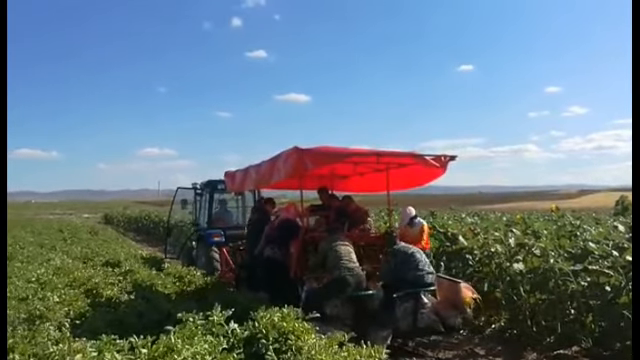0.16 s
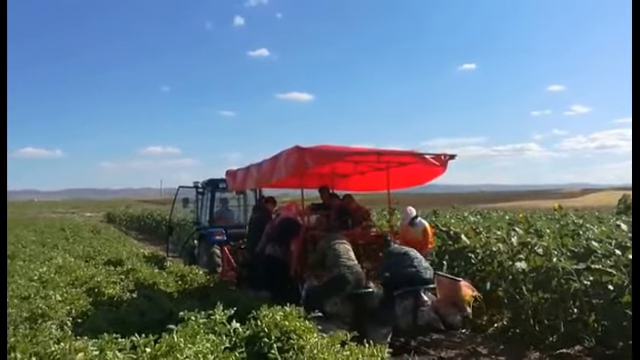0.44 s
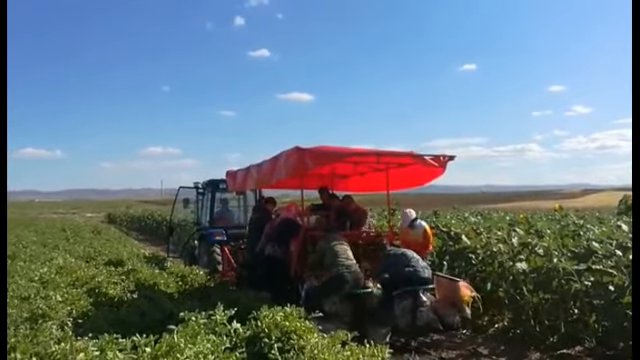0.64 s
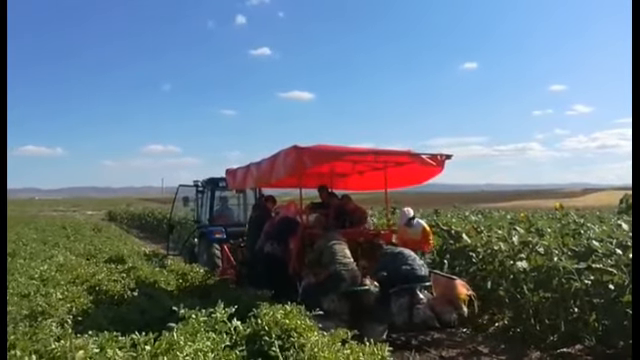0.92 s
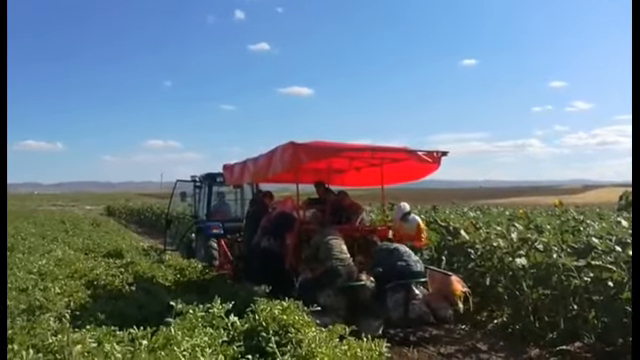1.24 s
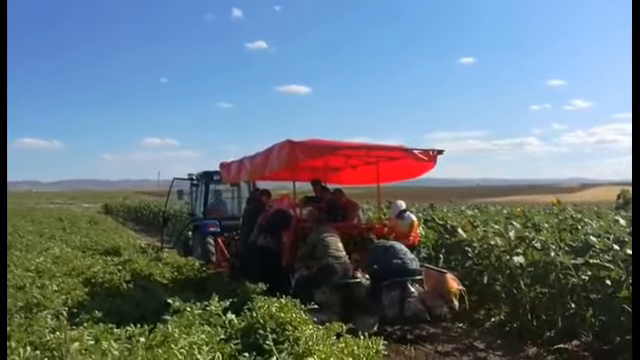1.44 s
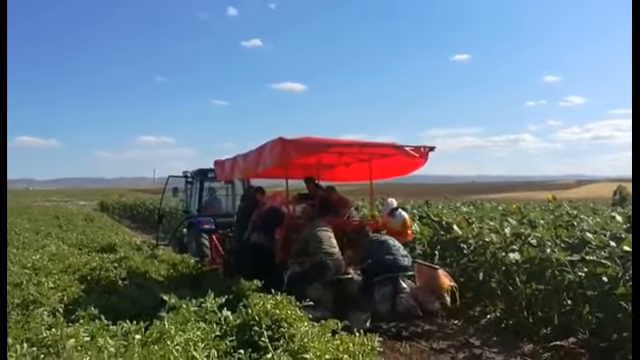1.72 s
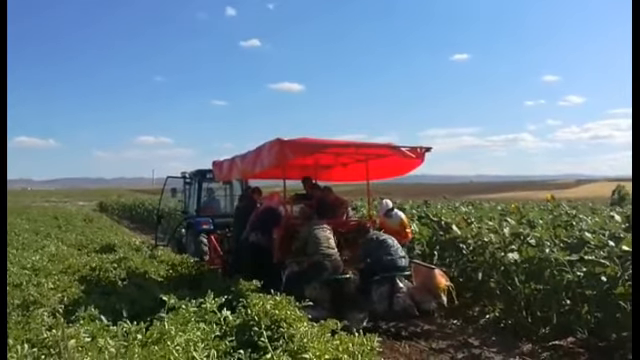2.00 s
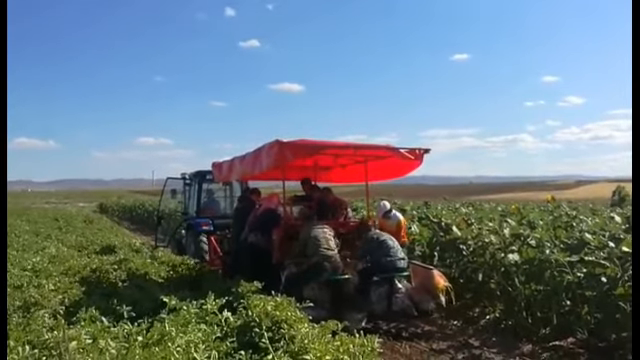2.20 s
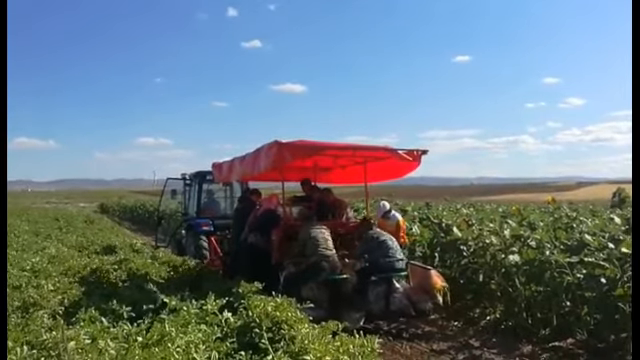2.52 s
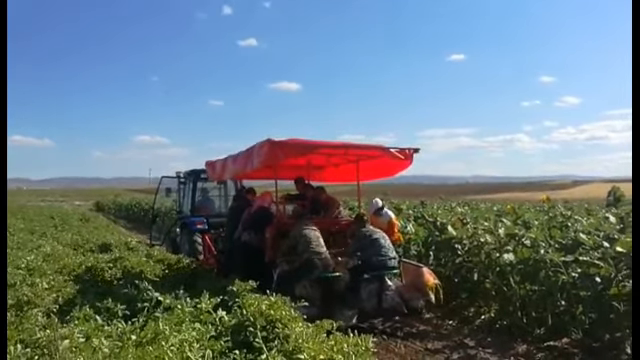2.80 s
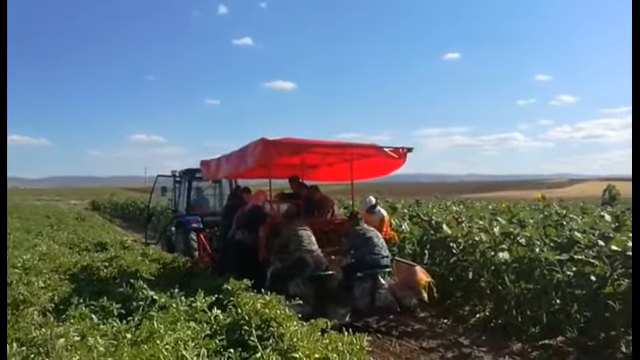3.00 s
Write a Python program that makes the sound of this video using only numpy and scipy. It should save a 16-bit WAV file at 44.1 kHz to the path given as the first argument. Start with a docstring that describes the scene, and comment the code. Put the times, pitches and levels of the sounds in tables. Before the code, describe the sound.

Harvester chain rattling steadily behind a rumbling tractor, with one metal clank and wind gusts.

```python
"""A tractor tows a potato harvester through a field, heard from several metres behind.
From the start the sieve chain clatters over the throbbing diesel, surging at each jolt; soil hisses
through the bars, stalks crackle and gusts rumble on the microphone. At 1.5 s a loose steel part clanks
and bounces, then the dry links squeak more often. The wind drops after 2.5 s; a faint clank comes at 3 s."""
import sys
import numpy as np
from scipy import signal
from scipy.fft import rfft, irfft
from scipy.io import wavfile

SR = 44100
rng = np.random.default_rng(int(sys.argv[2]) if len(sys.argv) > 2 else 0)


def output_pcm(signal):
    """Save a mono or channel-first signal as 16-bit PCM at the path in sys.argv[1].

    Samples are clipped to [-1, 1] before scaling.
    """
    pcm = np.clip(np.atleast_2d(signal).T, -1, 1) * 32767
    wavfile.write(sys.argv[1], SR, np.round(pcm).astype(np.int16))


N = 138915
T = np.arange(N) / SR
BIN_HZ = np.arange(N // 2 + 1) * SR / N
SIDES = np.array([[1], [-1]])  # left, right


def from_db(db):
    """Decibels to gain."""
    return 10 ** (np.asarray(db) / 20)


def unit_rms(x):
    """Scale to unit power."""
    return x / np.sqrt(np.mean(x ** 2) + 1e-20)


def per_sample(points):
    """Curve over time, read at every sample."""
    return np.interp(T, *np.transpose(points))


def per_bin(points):
    """Curve over log frequency, read at every bin."""
    hz, value = np.transpose(points)
    return np.interp(np.log(BIN_HZ + 1e-3), np.log(hz), value)


def drift(rate_hz):
    """Low-passed noise, unit RMS."""
    return unit_rms(irfft(rfft(rng.standard_normal(N)) / (1 + (BIN_HZ / rate_hz) ** 2), N))


def swell(centre_s, level_db, half_width_s):
    """Gaussian envelope."""
    return from_db(level_db) * np.exp(-((T - centre_s) / half_width_s) ** 2)


def pan(pan_db):
    """Channel gains; pan_db is left minus right."""
    return from_db(SIDES * pan_db / 2)


def ring(x, hz, t60_s):
    """One mode: a unit click rings a decaying unit sine."""
    r, w = from_db(-60 / (t60_s * SR)), 2 * np.pi * hz / SR
    return signal.lfilter([0, np.sin(w)], [1, -2 * r * np.cos(w), r * r], x + 1e-18)


def contacts(per_s, spread_db):
    """Two streams of random, uneven clicks."""
    sizes = from_db(spread_db * np.minimum(rng.exponential(1, (2, N)), 4))
    return sizes * rng.choice([-1, 1], (2, N)) * (rng.random((2, N)) < per_s / SR)


# Left-right likeness: freq_hz, coherence_before_clip
PORT_LIKENESS = [(40, 5), (90, 3), (150, 1.8), (300, 0.3), (560, 1), (950, 1), (1600, 0.57), (2300, 0.3),
                 (3300, 0.9), (6000, 0.24)]
# Left-right balance: freq_hz, pan_db
PORT_BALANCE = [(100, 1), (350, 1.5), (600, 5), (760, -2), (1050, 1), (1500, 2), (1780, 3), (2050, 0.5),
                (2700, 8.5), (3080, -4), (3700, 9.5), (4900, 11), (6300, -0.5), (9000, 2.5)]
# Left-right phase: freq_hz, left_lead_rad
PORT_LEAD = [(60, 0), (260, 1.11), (690, -1.26), (1600, 0.5), (1890, -0.5), (2300, -1.8), (3100, -0.9),
             (3800, -1), (6400, -2.5)]
def stereo(pair, colour_db=0):
    """Two unrelated signals to coloured left and right microphone ports, unit RMS."""
    mid, side = rfft(pair) * from_db(colour_db)
    coherence = np.clip(per_bin(PORT_LIKENESS), -.99, .99)
    mixed = np.sqrt(1 + coherence) * mid + SIDES * np.sqrt(1 - coherence) * side
    ports = pan(per_bin(PORT_BALANCE)) * np.exp(1j * SIDES * per_bin(PORT_LEAD) / 2)
    return unit_rms(irfft(mixed * ports, N))


def noise(spectrum):
    """Coloured stereo noise, unit RMS."""
    return stereo(rng.standard_normal((2, N)), per_bin(spectrum))


# Chain jolts: start_s, level_db, length_s, tilt_db_per_octave
CHAIN_JOLTS = [(0.081, -36.5, 0.05, 0.5), (0.29, -37.5, 0.023, 2), (0.383, -34.5, 0.0087, -5),
               (0.462, -42, 0.1, 1.5), (0.554, -40, 0.077, -3), (0.672, -38, .045, -3.5),
               (0.857, -35.5, 0.049, -3.5), (0.957, -39.5, 0.024, -0.5), (1.031, -39, 0.091, -3),
               (1.152, -33, 0.014, -3), (1.194, -42.5, 0.014, 8.5), (1.252, -35.5, 0.012, -3),
               (1.5, -39, 0.044, 2.5), (1.545, -34.5, 0.016, -2.5), (1.726, -35, 0.025, -2),
               (1.84, -38, 0.016, -2), (1.955, -35, 0.055, -1), (2.003, -34, 0.031, -3),
               (2.134, -41.5, 0.04, 1), (2.238, -44.5, 0.023, -2.5), (2.299, -40, 0.04, 0.5),
               (2.418, -42.5, 0.036, 5.5), (2.577, -37, 0.08, -1.5), (2.714, -37.5, 0.018, -5.5),
               (2.804, -34.5, 0.037, -1.5), (2.873, -35.5, 0.055, -1), (2.933, -39.5, .028, 5.5),
               (3.011, -37.5, 0.0091, -1), (3.1, -36, 0.052, -4)]
# Harvester frame modes: freq_hz, bandwidth_hz, gain_db
FRAME_MODES = [(615, 25, -17.5), (803, 100, -12), (1050, 120, -11.5), (1136, 96, -16), (1379, 39.5, -5),
               (1499, 40, -4), (1755, 75, -3), (1837, 45, -0.5), (1930, 86, -0.5), (2252, 95, -3.5),
               (2692, 50, -6.5), (2910, 140, -8), (3450, 21, -17)]
# Bar scrape: freq_hz, density_db
BAR_SPECTRUM = [(400, 9.5), (1200, -4), (2500, 3.5), (3600, 8), (4900, 2), (5900, -5.5), (7600, -6.5),
                (9000, -32), (10500, -50.5), (15000, -58)]
def sieve_chain():
    """Dense metal contacts ring the frame and scrape the bars, surging at each jolt."""
    attack_s, release_s, sag_db_per_s = .005, .022, 22
    idle_db, frame_gain_db, bar_gain_db, pivot_hz = -45.5, -6.5, -6.5, 1675
    start_s, level_db, length_s, tilt_db_per_octave = np.transpose(CHAIN_JOLTS)
    age_s = T - start_s[:, None]
    attack = np.clip(age_s / attack_s + .5, 0, 1)
    release = np.exp(-np.maximum(age_s - length_s[:, None], 0) / release_s)
    sag_db = sag_db_per_s * np.maximum(age_s, 0)
    jolt_power = (from_db(level_db[:, None] - sag_db) * attack * release) ** 2
    clicks = contacts(per_s=2500, spread_db=.5)
    frame = 0
    for k, (hz, bandwidth_hz, gain_db) in enumerate(FRAME_MODES):
        tilt = from_db(tilt_db_per_octave * np.log2(hz / pivot_hz))
        power = from_db(idle_db) ** 2 + tilt ** 2 @ jolt_power
        mode = ring(clicks * np.sqrt(power), hz, t60_s=np.log(1000) / (np.pi * bandwidth_hz))
        frame += (-1) ** k * from_db(gain_db) * np.sqrt(power.mean()) * unit_rms(mode)
    clatter = from_db(frame_gain_db) * frame.std() * stereo(frame)
    scrape_level = np.sqrt(from_db(tilt_db_per_octave) ** 2 @ jolt_power)  # one octave above the pivot
    return clatter + from_db(bar_gain_db) * scrape_level * stereo(clicks, per_bin(BAR_SPECTRUM))


# Engine orders: crank_multiple, gain_db
ENGINE_ORDERS = [(1, -5.5), (2, -7.5), (3, 3), (4, -7), (5, -4), (6, -4), (7, -13.5), (8, -6.5), (9, -10.5),
                 (10, -10)]
# Exhaust and running gear: freq_hz, density_db
EXHAUST_SPECTRUM = [(20, 22), (75, 12.5), (145, 3), (250, -14.5), (330, -22.5), (500, -21.5), (700, -20.5),
                    (1100, -21.5), (2000, -60), (9000, -85)]
def diesel():
    """Uneven crank orders over exhaust noise that pulses twice a turn."""
    crank_hz, wander, rough_db = 26.27, .0048, 3.5
    hum_gain_db, exhaust_db = -46.5, -39
    crank_rad = 2 * np.pi * np.cumsum(crank_hz * (1 + wander * drift(2.1))) / SR
    hum = 0
    for order, gain_db in ENGINE_ORDERS:
        level = from_db(gain_db + rough_db * drift(23))
        hum += level * np.sin(order * crank_rad + rng.uniform(0, 2 * np.pi))
    exhaust = from_db(exhaust_db) * noise(EXHAUST_SPECTRUM) * (1 + np.cos(2 * crank_rad))
    return from_db(hum_gain_db) * np.sqrt(2) * hum + exhaust


# Soil hiss: freq_hz, density_db
SOIL_SPECTRUM = [(300, -1.5), (700, -2.5), (1000, 2), (1800, 1), (2400, -2), (3800, -4), (4900, -8),
                 (5900, -17.5), (7600, -19.5), (8600, -51.5), (10500, -76.5)]
# Soil flow: time_s, level_db
SOIL_FLOW = [(0.0, -40), (0.95, -41), (1.67, -42), (2.19, -40.5), (2.67, -40.5), (2.82, -41), (3.15, -40)]
def soil():
    """Earth and stalks slide steadily over the sieve."""
    gain_db, flicker_db = -1.57, .5
    return from_db(per_sample(SOIL_FLOW) + gain_db - flicker_db * drift(13)) * noise(SOIL_SPECTRUM)


# Strikes and bounces: start_s, level_db, most_excited_hz, pan_db
STEEL_STRIKES = [(1.464, -27.5, 2930, 4), (1.507, -38, 4600, 6), (1.553, -37.5, 496, 2),
                 (3.018, -42.5, 3100, 7)]
# Steel part modes: freq_hz, gain_db, t60_s
STEEL_MODES = [(536, -4, .025), (1110, -2.5, 0.17), (1647, -6.5, 0.092), (1746, -11, 0.11),
               (2323, -6, 0.063), (2794, -19.5, 0.044), (3027, -8.5, 0.11), (3078, -1.5, 0.068),
               (4630, -13, .08), (4990, -16.5, 0.033), (8140, -22, 0.16), (8340, -23, .1),
               (8670, -27.5, .07)]
def steel_clank():
    """A loose steel part strikes with a crack and buzzes as it rings; each contact favours other modes."""
    rise_s, hold_s, crack_gain_db, crack_t60_s = .009, .008, -14.5, .22
    buzz_depth, buzz_hz, falloff_db_per_octave = .42, 150, 5

    def blow(start_s, t60_s):
        """Rise, hold, decay."""
        rise = np.clip((T - start_s) / rise_s + .5, 0, 1)
        return rise * from_db(-60 * np.maximum(T - start_s - hold_s, 0) / t60_s)

    crack = sum(from_db(db + crack_gain_db) * blow(s, crack_t60_s) for s, db, _, _ in STEEL_STRIKES)
    out = crack * noise(BAR_SPECTRUM)
    for hz, gain_db, t60_s in STEEL_MODES:
        buzz = 1 + buzz_depth * (drift(buzz_hz) + 1j * drift(buzz_hz))
        tone = np.real(buzz * np.exp(2j * np.pi * (hz * T + rng.random())))
        for start_s, level_db, most_excited_hz, pan_db in STEEL_STRIKES:
            falloff_db = falloff_db_per_octave * abs(np.log2(hz / most_excited_hz))
            out += pan(pan_db) * from_db(level_db + gain_db - falloff_db) * blow(start_s, t60_s) * tone
    return out


# Link squeaks: centre_s, level_db, half_width_s, pitch_hz
LINK_SQUEAKS = [(0.383, -40, .012, 1850), (1.519, -35, 0.016, 1880), (1.841, -40.5, 0.0072, 1850),
                (2.147, -48, .009, 1950), (2.255, -40, 0.041, 1835), (2.423, -39, 0.0088, 1910),
                (2.433, -39.5, 0.0137, 2010), (2.474, -38, 0.0057, 1985), (2.824, -40, 0.016, 1855),
                (3.015, -40.5, .022, 1440)]
def link_squeaks():
    """Dry links stick and slip on their rollers: short rough tones of unsteady pitch."""
    wander, jitter_hz, rough_db = .01395, 87, 2
    rad_per_hz = 2 * np.pi * np.cumsum(1 + wander * drift(jitter_hz)) / SR
    tones = sum(swell(*envelope) * np.sin(hz * rad_per_hz) for *envelope, hz in LINK_SQUEAKS)
    return pan(pan_db=2.5) * from_db(rough_db * drift(jitter_hz)) * tones


# Snap clusters: centre_s, level_db, half_width_s
STALK_CRACKLES = [(.285, -57.5, .012), (0.617, -52, 0.011), (2.2, -53, .01), (2.648, -51, 0.023),
                  (2.81, -52.5, 0.034), (2.943, -49, 0.034), (3.14, -52.5, 0.024)]
# Snap colour: freq_hz, density_db
SNAP_SPECTRUM = [(1500, -26), (4500, 6.5), (7000, -6), (9000, -7.5), (10500, -27), (11400, -11),
                 (12500, -22), (15000, -24)]
def stalks():
    """Dry stalks snap in the sieve in short bright clusters."""
    level = sum(swell(*crackle) for crackle in STALK_CRACKLES)
    return level * stereo(contacts(per_s=700, spread_db=4), per_bin(SNAP_SPECTRUM))


# Gusts: time_s, level_db
GUSTS = [(0, -28.5), (.15, -33.5), (.24, -38.5), (.33, -23.5), (.43, -33), (.58, -30), (.65, -35),
         (.71, -28.5), (.75, -30.5), (.87, -27), (.95, -38), (1.04, -29), (1.13, -32.5), (1.18, -39.5),
         (1.28, -28.5), (1.39, -25), (1.46, -35.5), (1.54, -49.5), (1.63, -36.5), (1.76, -31),
         (1.84, -31.5), (1.89, -40), (2.02, -32), (2.14, -39), (2.22, -32.5), (2.34, -34), (2.39, -41.5),
         (2.53, -36.5), (2.8, -49), (3.15, -45)]
# Wind rumble: freq_hz, density_db
RUMBLE_SPECTRUM = [(12, -22), (30, -12), (60, -3), (100, 0.5), (160, -3.5), (220, -9), (290, -20),
                   (380, -32.5), (600, -42.5), (1500, -92)]
# Strong-gust flutter: freq_hz, density_db
FLUTTER_SPECTRUM = [(60, -32), (160, 0.5), (250, 9), (320, 0), (400, -9.5), (650, -60), (3000, -100)]
# Single eddies: centre_s, level_db, pitch_hz, half_width_s
EDDIES = [(0.362, -23, 93, 0.032), (0.462, -18, 93.3, 0.021), (0.517, -20.5, 100, 0.021),
          (0.703, -23, 236, 0.0025), (.826, -22.5, 195, 0.0067), (.872, -21.5, 115, 0.0085),
          (1.003, -19.5, 153, 0.012), (1.684, -16, 95, 0.0019), (1.717, -15.5, 91, 0.0035),
          (1.803, -15, 158, 0.0022), (2.004, -18.5, 132, 0.0076), (2.014, -23, 47.5, 0.022),
          (2.225, -27, 101, 0.02), (2.33, -23.5, 131, 0.017)]
def wind():
    """Lumpy rumble swells and brightens with the gusts; eddies thump on the microphone ports."""
    shared_lumps_db, port_lumps_db, port_spread_rad = .5, 2.08, .3
    flutter_db, flutter_db_per_gust_db = -35, 1.37
    gust_db = per_sample(GUSTS)
    lumps_db = shared_lumps_db * drift(6.1) + port_lumps_db * np.array([drift(54), drift(55)])
    out = from_db(gust_db + lumps_db) * noise(RUMBLE_SPECTRUM)
    growth_db = flutter_db_per_gust_db * (gust_db - gust_db.max() + lumps_db)
    out += from_db(flutter_db + growth_db) * noise(FLUTTER_SPECTRUM)
    for centre_s, level_db, hz, half_width_s in EDDIES:
        phase = rng.uniform(0, 2 * np.pi) + rng.normal(0, port_spread_rad, (2, 1))
        out += swell(centre_s, level_db, half_width_s) * np.cos(2 * np.pi * hz * (T - centre_s) + phase)
    return out


def scene():
    """Tractor, harvester and wind in the open field."""
    return diesel() + soil() + sieve_chain() + link_squeaks() + stalks() + steel_clank() + wind()


def record(dry):
    """Steep low-pass on the top treble."""
    stop_hz, stop_db = 14700, 70
    return signal.sosfilt(signal.cheby2(12, stop_db, stop_hz, fs=SR, output="sos"), dry)


dry = scene()
out = record(dry)
output_pcm(out)
```